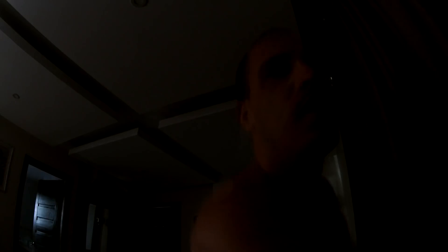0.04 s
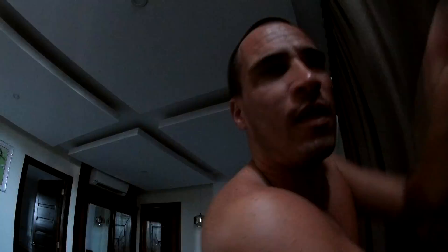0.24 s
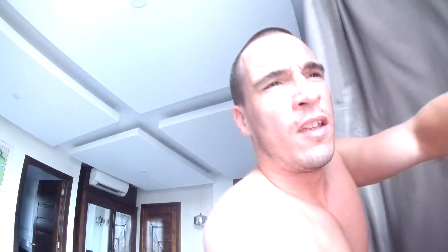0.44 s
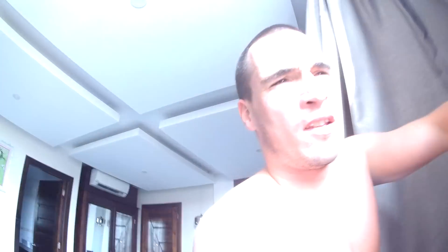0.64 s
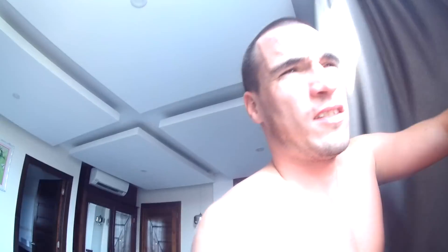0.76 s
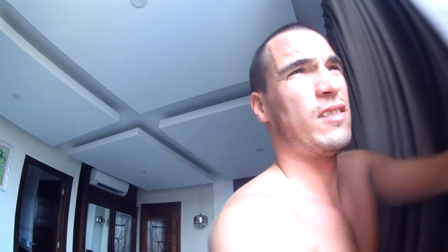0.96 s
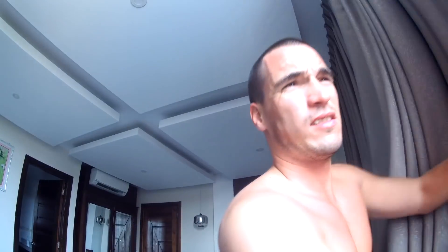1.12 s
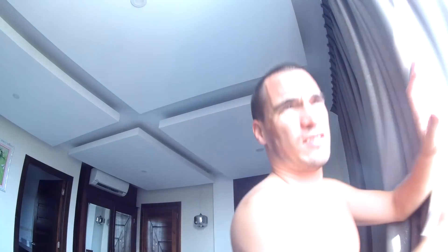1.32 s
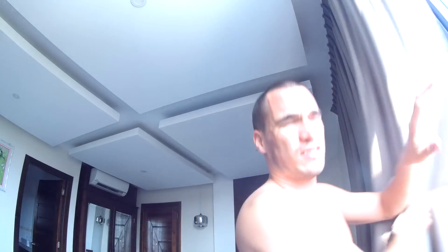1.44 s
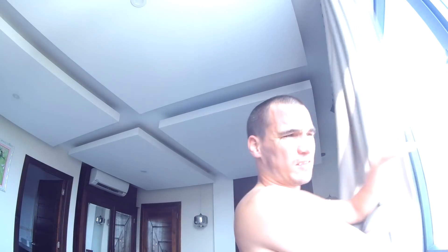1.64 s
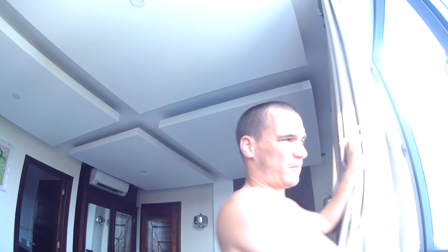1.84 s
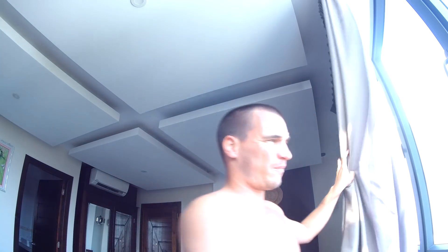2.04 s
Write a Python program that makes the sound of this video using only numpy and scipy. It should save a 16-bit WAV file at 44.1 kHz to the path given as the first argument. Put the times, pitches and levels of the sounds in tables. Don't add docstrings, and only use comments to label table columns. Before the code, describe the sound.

A heavy curtain is yanked open along its metal rail in two rasping, rattling pulls indoors.

```python
import sys
import numpy as np
from scipy import signal
from scipy.fft import rfft, irfft, next_fast_len
from scipy.io import wavfile
from scipy.ndimage import uniform_filter1d, map_coordinates

SR = 44100
rng = np.random.default_rng(int(sys.argv[2]) if len(sys.argv) > 2 else 0)


def gain_from_decibels(decibels):
    exponent = np.asarray(decibels, float) / 20
    return 10 ** exponent


def master(y):
    cut = np.clip(np.atleast_2d(y).T, -1, 1)
    pcm = np.round(cut * 32767)
    wavfile.write(sys.argv[1], SR, pcm.astype(np.int16))


N = 91772

# time_s, rasp_db, ring_over_rasp_db, dulling_db
PULLS = [
    [(0, -38.5, -15, 7), (.05, -32.5, -19, 0.5), (.06, -28.5, -6, -1.5), (.27, -23.5, -4.5, -4.5),
     (.455, -32, -2.5, -3), (.545, -35.5, -6, 6), (.62, -34.5, -8.5, -1), (.7, -45.5, 0, 1),
     (.78, -68, -2, -3)],
    [(1.27, -55, -12, 0), (1.3, -35, -11, -5.5), (1.41, -35.5, -10.5, -5), (1.53, -28, -3.5, -10),
     (1.65, -26.5, -5.5, -11), (1.77, -31, -9.5, 2), (1.87, -46.5, -5, -8), (1.97, -50, -7, -5),
     (2.08, -52, -10, -2)],
]
# freq_hz, density_db_per_hz
RASP_SPECTRA = [
    [(400, -30), (700, -7.5), (1300, 0.5), (1750, -7), (2800, -3.5), (4300, -9), (8000, -14.5),
     (15300, -34.5)],
    [(410, -8), (700, 0.5), (1460, -3.5), (2580, -4.5), (4110, -10.5), (6050, -16.5), (10700, -28),
     (12000, -32), (15300, -40)],
]
# centre_hz, width_hz, level_db
NEAR_RAIL = [(1100, 150, -4), (2380, 200, 1), (3350, 130, 1), (3500, 200, -1), (4810, 100, -11),
             (5900, 120, -13), (7660, 80, -5), (7800, 120, -8), (11520, 120, -12), (11720, 150, -15),
             (14300, 280, -20)]
# centre_hz, width_hz, level_db
FAR_RAIL = [(2250, 250, 3), (2655, 130, 2.5), (3900, 110, -7), (5280, 110, -7), (6060, 440, -7.5),
            (7920, 500, -6), (9700, 150, -10.5), (11950, 460, -9.5)]
SLIPS_PER_S, SLIP_SPREAD_DB, SLIP_SHARE = 2500, 3.5, 0.31
JOLT_DB, DULL_HZ = 0.35, 5230

# time_s, level_db
SWING = [(0, -26.5), (.04, -32), (.06, -20), (.17, -23), (.26, -19.5), (.44, -24.5), (.55, -27.5),
         (.7, -33.5), (.83, -38.5), (.92, -46.5), (1.16, -42), (1.28, -34), (1.35, -31), (1.5, -27),
         (1.61, -25.5), (1.76, -28.5), (1.9, -35), (2.08, -46)]
# freq_hz, density_db_per_hz
CLOTH_SPECTRUM = [(25, -5), (50, 4), (100, -5.5), (165, 0), (240, -6), (420, -5.5), (800, -14.5),
                  (2500, -34.5), (6000, -120)]
# centre_hz, width_hz, level_db
FOLD_MODES = [(135, 35, 4.5), (164.3, 14, 8), (300, 16, 7), (425.5, 24, 3.5), (483, 32, -9), (537, 92, 4.5)]
FOLDS_DB, CLOTH_DB = -6, 2.5
EVEN_BINS, EVEN_FRAMES = 5, 14

# freq_hz, density_db_per_hz
HISS_SPECTRUM = [(25, -0.5), (50, 5), (100, -5), (200, -22.5), (500, -20), (1200, -22.5), (4000, -37),
                 (15300, -46.5)]
HISS_DB = -46

# start_s, peak_db, pitch_hz
KNOCKS = [(0.047, -17, 300), (.056, -14.5, 1190), (.0555, -15, 2540), (0.061, -13.5, 1880),
          (0.072, -14, 286), (.084, -17, 240), (.105, -18, 480), (.124, -13.5, 416), (.144, -15, 190),
          (.256, -17, 288), (0.294, -12, 180), (0.243, -11, 410), (0.392, -18, 299), (.485, -14, 390),
          (.814, -25, 1000), (.819, -28, 860), (.819, -23, 430), (0.88, -38, 1130), (0.975, -31.5, 287),
          (1.074, -27.5, 427), (1.101, -34, 470), (1.192, -24, 840), (1.211, -24.5, 1350),
          (1.210, -28, 790), (1.213, -41, 420), (1.248, -34, 545), (1.2519, -23, 383), (1.255, -24, 800),
          (1.286, -27.5, 880), (1.329, -28, 300), (1.738, -23, 260), (1.89, -26, 238), (1.944, -26.5, 220)]
KNOCK_CYCLES, KNOCK_DB = 3, 4

# start_s, peak_db, pitch_hz, swell_s
BOOMS = [(0.052, -16, 56, 0.018), (0.139, -14, 51.6, 0.025), (0.218, -13.5, 52, 0.076),
         (0.458, -16, 49.2, 0.06), (0.513, -6.5, 81.5, 0.015), (.551, -17.5, 100, 0.029),
         (.604, -13.5, 49.6, 0.069), (.62, -22.5, 103, 0.063), (0.808, -19.5, 47.3, 0.097),
         (0.328, -39, 53.3, 0.043), (0.401, -21.5, 41, 0.029), (0.742, -21, 60.6, 0.038),
         (.71, -30.5, 142.7, 0.078), (0.861, -36.5, 135, 0.079), (.98, -38, 148, 0.047),
         (1.932, -40, 167, 0.048), (1.048, -29, 51, 0.031), (1.17, -27.5, 45.5, 0.09),
         (1.259, -26.5, 42.8, 0.1), (1.33, -24, 60.6, 0.029), (1.42, -24.5, 50.3, 0.07),
         (1.497, -22.5, 48, 0.041), (1.579, -18, 50.5, 0.038), (1.662, -21, 59, 0.029),
         (1.7078, -14.5, 56.8, 0.053), (1.765, -24.5, 48.2, 0.059), (1.842, -23.5, 47.1, 0.11),
         (1.981, -23, 48.9, 0.12)]

# start_s, peak_db, ring_over_crack_db, snap_over_crack_db
TICKS = [(0.0559, -15.5, 4.5, -14), (0.109, -26, 15, -11), (.13, -16, 9, -15), (0.182, -22, -5, -2),
         (.2714, -31, -16, -10), (0.3972, -20.5, -13, -7), (0.5582, -25, -2, -17), (0.619, -36, -9, -2),
         (0.66, -40, -8, 0), (.679, -43, -8, 7), (.7208, -42, 0, -15), (.780, -31, -22, -22),
         (.7985, -32, 2, -13), (0.813, -27.5, 5, -11), (1.136, -34, 4, -18), (1.1772, -25, 5.5, -9),
         (1.2938, -33, -14, -12), (1.3015, -35, -14, -10), (1.3226, -24, -20, -18), (1.38, -26, 2, -12),
         (1.4096, -32, -16, -10), (1.4818, -22.5, -14, -4), (1.5736, -15, -14, -12), (1.6759, -19, -14, -7),
         (1.70, -25, -14, -4), (1.757, -37, -14, 7.5), (1.8385, -41.5, -4, 6.5), (2.052, -38, -14, -7),
         (2.062, -33.5, -14.5, -16)]
# freq_hz, level_db
CRACK_SPECTRUM = [(600, -10), (2000, 7), (5000, -3), (10000, -10), (15500, -16)]
# freq_hz, level_db
SNAP_SPECTRUM = [(3000, -40), (6000, 7), (9000, 2), (12500, -3), (15500, -20)]
# centre_hz, width_hz, level_db
JINGLE_MODES = [(7620, 24, 6), (7770, 52, 2), (8500, 44, -11), (11440, 52, -0.5), (11900, 57, -5),
                (14300, 150, -22)]
# pitch_hz, level_db, t60_s
CHIME_MODES = [(7650, -36, 0.26), (7650, -31.5, .3), (7760, -31, .2), (11700, -35.5, .25),
               (11500, -34, 0.23), (14400, -44, .15)]
TICK_T60_S, RATTLE_T60_S, RATTLE_DB = 0.014, 0.27, -10

# freq_hz, t60_s
ROOM_DECAY = [(100, 1), (1000, 0.19), (10000, 0.38)]
WET_DB, TOP_HZ = -14, 15080


def unit(x):
    return x / np.sqrt(np.mean(x ** 2) + 1e-20)


def along(points, hz):
    f, v = np.transpose(points)
    return np.interp(np.log(hz + 1), np.log(f + 1), v)


def curves(rows, outside=None):
    time_s, *columns = np.transpose(rows)
    t = np.arange(N) / SR
    return [np.interp(t, time_s, column, outside, outside) for column in columns]


def wobble(rate_hz):
    knots = rng.standard_normal(int(N * 400 / SR) + 4)
    return map_coordinates(knots, [np.arange(N) * min(rate_hz, 400) / SR])


def filtered(x, response):
    m = next_fast_len(N + SR // 2)
    return irfft(rfft(x, m) * response(np.fft.rfftfreq(m, 1 / SR)), m)[:N]


def coloured(x, points):
    return filtered(x, lambda hz: gain_from_decibels(along(points, hz)))


def resonant(x, peaks):
    def response(f):
        total = 0
        for k, (centre_hz, width_hz, db) in enumerate(peaks):
            damping = 1j * f * width_hz
            total = total + (-1) ** k * gain_from_decibels(db) * damping / (centre_hz ** 2 - f * f + damping)
        return total
    return filtered(x, response)


def slips():
    chance = rng.random(N)
    size = np.minimum(rng.exponential(size=N), 5)
    sign_noise, smooth = rng.standard_normal((2, N))
    grains = unit((chance < SLIPS_PER_S / SR) * np.sign(sign_noise) * gain_from_decibels(SLIP_SPREAD_DB * size))
    return np.sqrt(SLIP_SHARE) * grains + np.sqrt(1 - SLIP_SHARE) * smooth


def gliders():
    out = np.zeros(N)
    for rows, spectrum, rail in zip(PULLS, RASP_SPECTRA, (NEAR_RAIL, FAR_RAIL)):
        level_db, ring_db, dull_db = curves(rows, outside=-120)
        jolt_db = JOLT_DB * wobble(13.5) + 0.29 * wobble(69.4)
        rasp = unit(coloured(slips(), spectrum))
        top = filtered(rasp, lambda hz: 1 / (1 + (DULL_HZ / (hz + 1)) ** 4))
        dulled = rasp - top + gain_from_decibels(-dull_db * (level_db > -120)) * top
        out += gain_from_decibels(level_db + jolt_db - 1.06) * dulled
        drive = slips() * gain_from_decibels(1.6 * wobble(44.9))
        ring = resonant(gain_from_decibels(level_db + ring_db + jolt_db) * drive, rail)
        out += ring / np.std(resonant(drive, rail))
    return out


def even_noise():
    z = signal.stft(rng.standard_normal(N), nperseg=1024, noverlap=768)[2]
    patch = uniform_filter1d(abs(z) ** 2, size=EVEN_BINS, axis=0)
    patch = uniform_filter1d(patch, size=EVEN_FRAMES, axis=1)
    return signal.istft(z / np.sqrt(abs(patch) + 1e-20), nperseg=1024, noverlap=768)[1][:N]


def cloth():
    motion_db, = curves(SWING)
    swish = unit(coloured(even_noise(), CLOTH_SPECTRUM))
    folds = unit(resonant(even_noise(), FOLD_MODES))
    lumps_db = 0.75 * wobble(29.97) + 0.82 * wobble(90)
    return gain_from_decibels(motion_db + CLOTH_DB + lumps_db) * unit(swish + gain_from_decibels(FOLDS_DB) * folds)


def hiss():
    level_db = HISS_DB + 11 + 0.27 * wobble(3.8)
    return gain_from_decibels(level_db) * unit(coloured(rng.standard_normal(N), HISS_SPECTRUM))


def knocks():
    out = np.zeros(N + SR)
    t = np.arange(SR // 10) / SR
    for start_s, db, hz in KNOCKS:
        u = t * hz / KNOCK_CYCLES * 4
        tone = np.sin(2 * np.pi * hz * t / (1 + 0.04 * u))
        out[round(start_s * SR):][:len(t)] += gain_from_decibels(db + KNOCK_DB) * u ** 2 * np.exp(-u) * tone
    return out[:N]


def booms():
    out = np.zeros(N)
    t = np.arange(N) / SR
    for start_s, db, hz, swell_s in BOOMS:
        u = np.clip((t - start_s) / swell_s * 2, 0, 60)
        out += gain_from_decibels(db) * u * np.exp(1 - u) * np.sin(2 * np.pi * hz * (t - start_s))
    return out


def ticks():
    crack, ring, snap, chime = np.zeros((4, N + SR))
    t = np.arange(SR // 5) / SR
    blow = gain_from_decibels(-60 * (t / TICK_T60_S) ** 1.56) * (1 - np.exp(-t / 0.0011))
    rattle = gain_from_decibels(RATTLE_DB - 60 * t / RATTLE_T60_S) * (1 - np.exp(-t / 0.0013))
    shape = blow + rattle
    for start_s, db, ring_db, snap_db in TICKS:
        noise = rng.standard_normal((3, len(t)))
        span = slice(round(start_s * SR), round(start_s * SR) + len(t))
        crack[span] += gain_from_decibels(db) * shape * noise[0]
        ring[span] += gain_from_decibels(db + ring_db) * shape * noise[1]
        snap[span] += gain_from_decibels(db + snap_db) * blow * noise[2]
        for k, (hz, mode_db, t60_s) in enumerate(CHIME_MODES):
            level_db = db + ring_db + mode_db + 1.3 * noise[2, k] - 60 * t / t60_s
            chime[span] += gain_from_decibels(level_db) * np.sin(2 * np.pi * hz * t + k * noise[1, k])
    jingle = resonant(ring[:N] * gain_from_decibels(2.1 * wobble(151.2)), JINGLE_MODES)
    cracks = gain_from_decibels(-5.5) * coloured(crack[:N], CRACK_SPECTRUM)
    return cracks + coloured(snap[:N], SNAP_SPECTRUM) + chime[:N] + gain_from_decibels(-8) * jingle


def room(x):
    hz, t, z = signal.stft(rng.standard_normal(SR // 2), SR, nperseg=256)
    decay = gain_from_decibels(-60 * t / along(ROOM_DECAY, hz)[:, None])
    tail = signal.istft(z * decay, SR, nperseg=256)[1]
    delayed = np.pad(x, (300, 0))
    return signal.fftconvolve(delayed, tail / np.linalg.norm(tail))[:N]


def scene():
    near = gliders() + knocks() + ticks()
    return (near + gain_from_decibels(WET_DB) * room(near) + cloth() + hiss() + booms())[None]


def roll_off(x):
    return signal.sosfilt(signal.butter(12, 15490, fs=SR, output="sos"), x)


def record(dry):
    band = filtered(dry[0], lambda hz: 1 / (1 + (hz / TOP_HZ) ** 300))
    return roll_off(band[None])


dry = scene()
out = record(dry)
master(out)
```